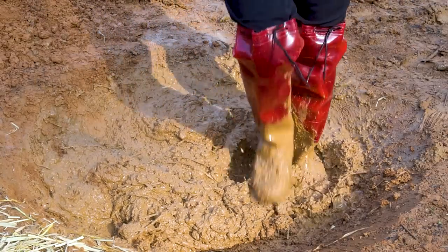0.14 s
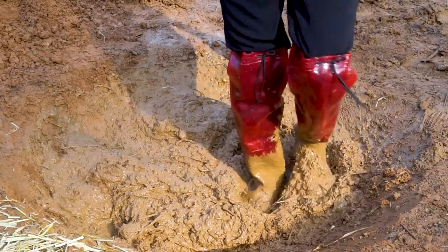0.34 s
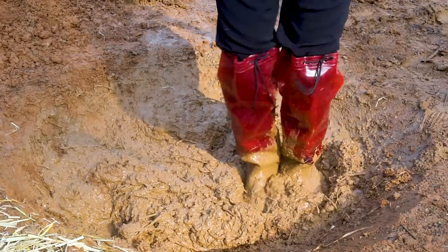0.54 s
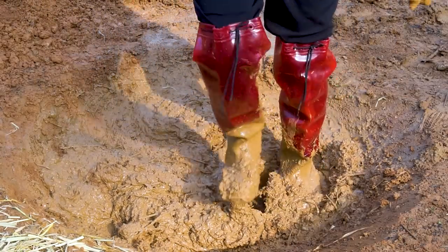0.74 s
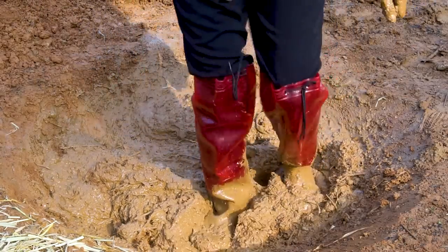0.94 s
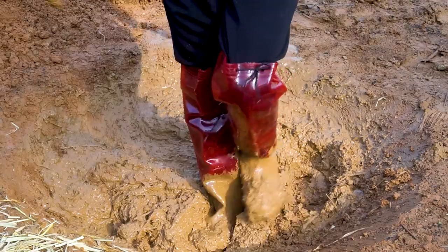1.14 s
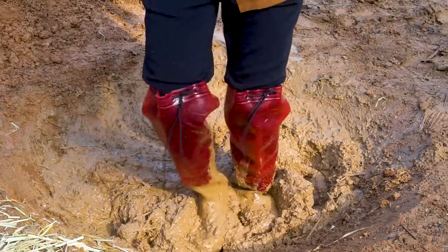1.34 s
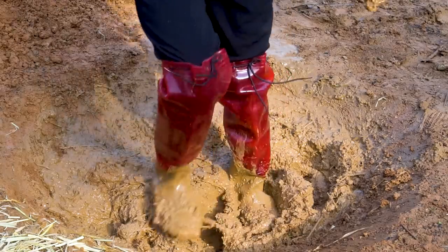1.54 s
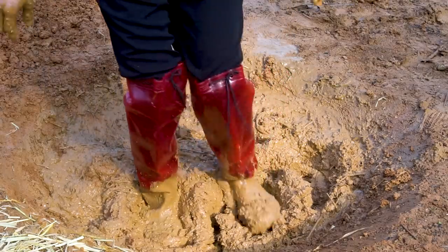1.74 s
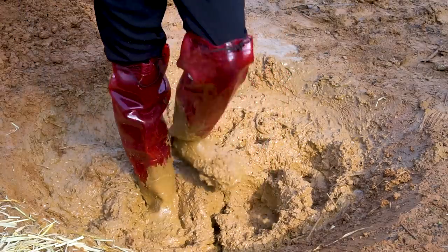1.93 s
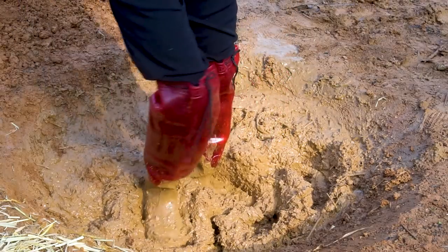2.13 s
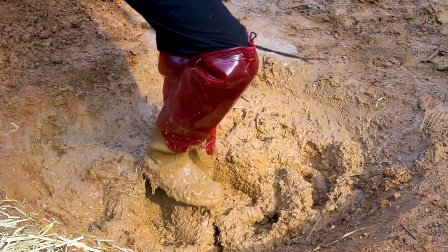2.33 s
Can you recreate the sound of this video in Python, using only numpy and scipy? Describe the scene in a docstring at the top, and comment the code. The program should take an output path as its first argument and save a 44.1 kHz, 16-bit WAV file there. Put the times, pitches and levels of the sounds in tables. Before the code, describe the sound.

Rubber boots squelch in thick wet mud, close and crisp outdoors. Splashy, bubbly bursts at 0.2-0.4 s are followed by softer sticky ones at 0.5-0.65. After a lull, wet squeezes come at 0.9-1.0, a loud snapping plop at 1.26, fizzing suction at 1.4, sprayy squelches at 1.65, hollow plops at 1.75-1.8, and more at 2.03 and 2.2, fading to faint ticks over quiet air and thin insect-like hiss.

```python
"""Outdoors on wet mud and straw, a stereo microphone close to rubber boots, about three treads a second.
Each tread squeezes out air and water in squelches: swarms of big pockets, small bubbles and fine spray,
made of random clicks ringing many resonances. Noise bursts that ring a cavity are wet films snapping;
brief rising tones are trapped air plopping, and sparse faint ticks are the mud settling.
Behind the boots lies quiet air with a thin, insect-like hiss, both of shaped noise."""
import sys
import numpy as np
from scipy import signal
from scipy.fft import rfft, irfft, next_fast_len
from scipy.io import wavfile
from scipy.ndimage import uniform_filter1d, map_coordinates

SR = 44100
rng = np.random.default_rng(int(sys.argv[2]) if len(sys.argv) > 2 else 0)


def dump_mix(stems):
    """Bounce the given channels to the path in sys.argv[1] as a 16-bit WAV at rate SR."""
    frames = np.atleast_2d(stems).T  # one column per channel
    limited = np.clip(frames, -1, 1)  # hard clip at full scale
    pcm = np.round(limited * 32767).astype(np.int16)
    wavfile.write(sys.argv[1], SR, pcm)


N = 110250
TIME = np.arange(N) / SR

# Squelches, in time order: peak_s, swell_s, fade_s, pockets_db, bubbles_db, spray_db, bubble_pitch_hz
SQUELCHES = [ (.005, 0.0063, 0.032, -52, -48, -49.5, 2420), (0.209, 0.011, 0.018, -38, -29, -27, 2580),
             (0.232, 0.0042, 0.0048, -30.5, -28.5, -21, 2520), (0.265, 0.016, 0.025, -50, -40, -41, 2220),
             (0.286, 0.0079, 0.017, -33.5, -34.5, -58, 1290),
             (0.303, 0.012, 0.024, -37.5, -33.5, -43.5, 1560),
             (0.369, 0.0086, 0.0088, -39, -35, -45.5, 2420), (0.386, 0.02, 0.061, -46.5, -46, -50, 1200),
             (0.512, 0.012, 0.011, -41, -39, -37, 3530), (0.537, 0.0096, 0.014, -36.5, -36.5, -32, 2080),
             (0.617, 0.068, 0.013, -50, -43.5, -47, 2080), (0.637, 0.024, 0.04, -51.5, -41.5, -43.5, 2680),
             (0.897, 0.0061, 0.013, -37, -34.5, -27, 3280), (0.94, 0.043, 0.022, -47, -38.5, -37.5, 2310),
             (0.989, 0.01, 0.0072, -38, -49, -63, 1800), (1.016, 0.021, 0.021, -46.5, -40.5, -40.5, 3030),
             (1.10, 0.077, 0.05, -59, -54, -52, 2900), (1.24, 0.014, 0.01, -44.5, -37.5, -31, 2480),
             (1.250, 0.0049, 0.0075, -34, -32, -34.5, 1900),
             (1.266, 0.0073, 0.0089, -30.5, -26.5, -29.5, 1780),
             (1.297, 0.015, 0.013, -45.5, -41.5, -44, 1690), (1.321, 0.016, 0.0072, -51, -38, -36, 2400),
             (1.336, 0.0059, 0.0067, -41.5, -43.5, -33, 2800), (1.407, 0.038, 0.023, -45, -28.5, -31, 3300),
             (1.42, 0.0031, 0.017, -41, -41, -55, 2030), (1.629, 0.0092, 0.016, -43.5, -39, -32, 3230),
             (1.644, 0.0066, 0.011, -37, -29.5, -24, 3140), (1.685, 0.029, 0.041, -55.5, -50, -48.5, 2500),
             (1.751, 0.011, 0.033, -36.5, -41, -51, 1290), (1.795, 0.012, 0.0086, -35.5, -30, -29, 2130),
             (1.799, 0.0091, 0.0062, -26.5, -28, -43, 1340), (1.82, 0.0027, 0.01, -42.5, -40.5, -41, 3550),
             (1.89, .041, 0.067, -57.5, -60, -51.5, 3020), (2.018, 0.0024, 0.003, -50, -30.5, -33, 2420),
             (2.037, 0.015, 0.0034, -32.5, -32.5, -25.5, 2200),
             (2.056, 0.044, 0.017, -44.5, -45, -43, 2280), (2.111, 0.031, 0.053, -54, -47, -45.5, 2300),
             (2.175, 0.019, 0.011, -43, -36, -38, 3330), (2.213, 0.022, 0.013, -32, -27, -27.5, 1950),
             (2.30, 0.052, 0.12, -64.5, -62, -52.5, 2380), (2.474, 0.036, 0.1, -58, -51.5, -47.5, 2720), ]
# Wet films snapping: start_s, level_db, cavity_pitch_hz, crack_re_cavity_db (both dB before the trims below)
SNAPS = [(0.2253, -15.5, 2560, 5), (.322, -17, 3950, -16), (0.3317, -20.5, 1520, -1.5),
         (0.3666, -15, 2320, -26), (0.409, -23.5, 2590, -22), (0.4407, -27.5, 3820, -10),
         (0.504, -27, 2700, -13), (0.531, -17.5, 2090, -7.5), (0.581, -24.5, 2260, -7),
         (0.866, -39.5, 8900, -1), (0.8893, -17.5, 3520, -9), (0.924, -19.5, 5630, -11),
         (.962, -30, 2310, 8), (1.034, -23, 2000, 3), (1.1201, -19, 2270, -40), (1.2619, -20, 1850, 3),
         (1.2652, -8, 2010, -1), (1.6448, -25, 4840, 6), (1.692, -20, 1820, -18), (1.708, -28, 3700, -16),
         (1.783, -16, 2850, -24), (2.014, -45, 4140, 11), (2.1041, -23, 1990, 6), (2.1164, -29.5, 2500, 13),
         (2.173, -15.5, 3500, -10), (2.446, -35.5, 2450, 7.5), (2.459, -38, 2530, 14),
         (2.480, -32.5, 3030, 12.5)]
# Trapped air plopping: start_s, level_db, start_pitch_hz, ring_t60_s
PLOPS = [(.228, -18, 2480, 0.029), (.279, -27, 1244, .025), (0.2989, -23.5, 1830, 0.02),
         (.386, -35, 555, 0.036), (.980, -30.5, 365, 0.057), (0.994, -25.5, 1840, 0.011),
         (1.2448, -25, 1870, 0.018), (1.2622, -11.5, 1120, 0.011), (1.264, -18, 680, 0.023),
         (1.7405, -23, 553, 0.044), (1.756, -32, 1700, 0.01), (1.769, -24, 470, 0.0071),
         (1.774, -11, 1650, 0.0078), (1.793, -18, 1230, 0.012), (1.7965, -20, 573, .02),
         (2.139, -28.5, 793, 0.035), (2.2015, -21, 3280, 0.019), (2.202, -24, 728, 0.044)]
# Colour of each swarm, by the pitch of its bubbles: pitch_hz, level_db
POCKET_COLOUR = [(220, -9.5), (330, -0.5), (460, -1.5), (660, -1), (900, 10.5)]
BUBBLE_COLOUR = [(900, -29), (1200, 0), (1800, -1), (2500, -0.5), (3300, 1), (4200, 1)]
SPRAY_COLOUR = [(4500, 4.5), (6000, -1.8), (8500, -5.5), (11500, 4), (15000, 0.5)]
# Resonances of the boots and the trodden hollow: pitch_hz, level_db
HOLLOW = [(1190, -19.5), (2450, -11.5), (3250, -4.5), (4800, -9)]
# Where the boots stand before the microphone: time_s, left_minus_right_db
PAN = [(.3, -2.1), (.95, -1.6), (1.4, -1.7), (1.75, -0.9), (2.1, -1)]
# Fixed stereo offset, level: frequency_hz, left_minus_right_db
LEFT_LOUDER = [(200, 2), (700, 2), (1300, 2.5), (2400, 1.5), (4400, 4.5), (8000, 6), (15000, 4)]
# Fixed stereo offset, phase: frequency_hz, right_lead_rad
RIGHT_LEADS = [(100, 0), (500, 0.5), (950, 0.66), (2400, 0.3), (3900, 0.11), (5000, 0.42), (8000, 0.43),
               (15000, 0.67)]
# Spectrum of the quiet air: frequency_hz, density_db (dB per Hz, relative)
AIR = [(30, -19), (120, -11.5), (300, 0), (700, 6), (1000, 1.5), (1800, 0.5), (3000, -2), (4300, -3),
       (6500, -4.5), (9500, -6), (11500, -1), (16000, -10.5)]

# Squelches
SWELL_SHAPE, FADE_SHAPE = 1.99, 1.37  # 1 = exponential, 2 = bell
BUBBLE_RANGE_OCT, PITCH_FALL_OCT_PER_S = 1, 4.8
# the slower a squeeze swells, the less of the finest spray it throws: dB per second of swell
MIST_HZ, MIST_LOSS_DB_PER_S = 9000, 113
# Grain: bursts per s for each size, cycles rung, spread of strength in dB, share bursting together
POCKET_GRAIN = (70, 15, 2.5, .2)
BUBBLE_GRAIN = (110, 30, 3.8, .18)
SPRAY_GRAIN = (600, 26, 4.2, .22)
CLUMP_PER_S, CLUMP_DB = 45, 3  # wander of the burst strength
STRETCH_PER_S, STRETCH_SHARE = 20, .08  # wander of the pitch

# Snaps, plops and settling mud
SNAP_DB, SNAP_DECAY_S, SNAP_CYCLES = -11.5, 0.0018, 7.7
CRACK_DB, CRACK_BAND_HZ = 1, (690, 15000)
PLOP_ATTACK_CYCLES, PLOP_RISE_PER_S = 1.56, 3.7  # pitch rises by this share of its start per second
SETTLING_DB, SETTLING_PER_S, SETTLING_SPREAD_DB, SETTLING_CYCLES = -66.5, 11, 2.5, 14

# Place and background
HOLLOW_WIDTH_HZ = 73
LOW_CUT_HZ = 132
GROUND_ECHO_S, GROUND_ECHO_DB, GROUND_DULL_HZ = .00166, -7, 3500
TAIL_DB, TAIL_T60_S, TAIL_DULL_HZ = -15, 0.28, 5540
AIR_DB = -57.5
INSECT_HZ, INSECT_WIDTH_HZ, INSECT_DB = 5050, 270, -58
CUTOFF_HZ = 16000


def squelches():
    """Each squeeze swells and fades, driving the three swarms; the small bubbles centre on a falling pitch."""
    power, octave, mist = np.zeros((3, N)), np.zeros(N), np.zeros(N)
    for peak_s, swell, fade, *levels_db, hz in SQUELCHES:
        t = TIME - peak_s
        before = (np.abs(t) / swell) ** SWELL_SHAPE
        after = (np.abs(t) / fade) ** FADE_SHAPE
        envelope = np.exp(-np.minimum(np.where(t < 0, before, after), 20))
        flow = (from_db(levels_db)[:, None] * envelope) ** 2
        power += flow
        mist += flow[2] * from_db(-MIST_LOSS_DB_PER_S * swell)
        octave += flow[1] * (np.log2(hz) - PITCH_FALL_OCT_PER_S * np.clip(t, -swell, 2 * fade))
    centre = octave / power[1]  # overlapping squeezes share the pitch by their power

    def near_centre(hz):
        """Bubbles far in pitch from the moving centre are weaker."""
        return 1 / (1 + ((np.log2(hz) - centre) / BUBBLE_RANGE_OCT) ** 2)

    pockets = swarm(POCKET_COLOUR, POCKET_GRAIN, even_s=.011)
    bubbles = swarm(BUBBLE_COLOUR, BUBBLE_GRAIN, even_s=.007, weight=near_centre)
    spray = swarm(SPRAY_COLOUR, SPRAY_GRAIN, even_s=.005)
    hz = np.arange(N // 2 + 1) * SR / N
    finest = irfft(rfft(spray) * (hz > MIST_HZ), N)
    spray = spray + (mist / power[2] - 1) * finest
    return np.sum(np.sqrt(power) * [pockets, bubbles, spray], axis=0)


def swarm(colour, grain, even_s, weight=lambda hz: 1, count=14):
    """Bubbles of many sizes burst in clumps, alone or together, gliding as the mud deforms; flow is evened."""
    per_s, cycles, spread_db, together = grain
    lowest_hz, highest_hz = colour[0][0], colour[-1][0]
    shared, out = bursts(per_s, spread_db), 0
    # an uneven clock bends the pitch of all sizes alike
    clock = np.cumsum(1 + STRETCH_SHARE * drift(STRETCH_PER_S))
    for hz in np.geomspace(lowest_hz, highest_hz, count):
        clicks = bursts(per_s, spread_db) + together * shared * rng.standard_normal(N)
        clumped = clicks * from_db(CLUMP_DB * drift(CLUMP_PER_S))
        rings = resonate(clumped, hz, cycles)
        gliding = map_coordinates(rings, [clock], order=3, mode="mirror")
        out = out + from_db(at_hz(colour, hz)) * weight(hz) * rms_one(gliding)
    low_cut = signal.butter(3, lowest_hz * 1.154, "high", fs=SR, output="sos")
    out = rms_one(signal.sosfilt(low_cut, out))
    # divide by the running level, averaged twice, so the squeezes alone shape the flow
    size = int(even_s * SR) + 1
    running_power = uniform_filter1d(uniform_filter1d(out ** 2, size), size)
    return out / np.sqrt(running_power + 1e-4)


def snaps():
    """A film tears in a tiny crack that rings the cavity behind it."""
    out, t = np.zeros(N + SR), TIME[:SR // 20]
    crack_band = signal.butter(2, CRACK_BAND_HZ, "band", fs=SR, output="sos")
    for start_s, level_db, hz, crack_re_cavity_db in SNAPS:
        tear = rng.standard_normal(len(t)) * np.exp(-t / SNAP_DECAY_S)
        cavity = resonate(tear, hz, SNAP_CYCLES)
        crack = signal.sosfilt(crack_band, tear)
        snap = rms_one(cavity) + from_db(CRACK_DB + crack_re_cavity_db) * rms_one(crack)
        i = int(start_s * SR)
        out[i:i + len(t)] += from_db(level_db + SNAP_DB) * snap * np.sqrt(SNAP_DECAY_S / t[-1])
    return out[:N]


def plops():
    """A large air pocket opens and rings briefly, rising in pitch."""
    out = np.zeros(N)
    for start_s, level_db, hz, t60 in PLOPS:
        t = np.clip(TIME - start_s, 0, 2 * t60)
        decay = from_db(level_db - 60 * t / t60)
        attack = 1 - np.exp(-(t * hz / PLOP_ATTACK_CYCLES) ** 2)
        cycles = hz * (t + PLOP_RISE_PER_S * t * t / 2)
        out += decay * attack * np.sin(2 * np.pi * cycles)
    return out


def settling():
    """Kneaded mud relaxes in faint, sparse ticks at seven spread pitches."""
    ticks = 0
    for hz in np.geomspace(2000, 13000, 7):
        ticks = ticks + resonate(bursts(SETTLING_PER_S, SETTLING_SPREAD_DB), hz, SETTLING_CYCLES)
    return from_db(SETTLING_DB) * rms_one(ticks)


def hollow(x):
    """The same few resonances of boots and hollow colour every squelch and snap."""
    out = x
    for hz, level_db in HOLLOW:
        b, a = signal.iirpeak(hz, hz / HOLLOW_WIDTH_HZ, fs=SR)
        out = out + from_db(level_db) * signal.lfilter(b, a, x)
    return out


def outdoors(x):
    """A bounce off the ground, a place slightly off centre, and a faint scattered tail from the yard."""
    size = next_fast_len(N + SR)
    hz = np.arange(size // 2 + 1) * SR / size
    delay = np.exp(-2j * np.pi * hz * GROUND_ECHO_S)
    bounce = from_db(GROUND_ECHO_DB) * delay / (1 + (hz / GROUND_DULL_HZ) ** 2)
    near = rfft(x, size) * (1 + bounce)
    # half of the level and phase offset goes to each channel
    left = from_db(at_hz(LEFT_LOUDER, hz) / 2) * np.exp(-.5j * at_hz(RIGHT_LEADS, hz))
    fading_noise = rng.standard_normal((2, SR)) * from_db(-60 * TIME[:SR] / TAIL_T60_S)
    scatter = rms_one(fading_noise) / np.sqrt(SR)  # unit energy
    tail = from_db(TAIL_DB) * rfft(scatter, size) / (1 + 1j * hz / TAIL_DULL_HZ)
    return irfft(near * (np.array([left, 1 / left]) + tail), size)[:, :N]


def background():
    """Still air and a narrow, far, insect-like hiss: shaped noise, independent in each channel."""
    hz = np.arange(N // 2 + 1) * SR / N
    air = irfft(rfft(rng.standard_normal((2, N))) * from_db(at_hz(AIR, hz)), N)
    insect_band = 1 / (1 + ((hz - INSECT_HZ) / INSECT_WIDTH_HZ) ** 2)
    insects = irfft(rfft(rng.standard_normal((2, N))) * insect_band, N)
    return from_db(AIR_DB) * rms_one(air) + from_db(INSECT_DB) * rms_one(insects)


def bursts(per_s, spread_db):
    """Random clicks of uneven size and sign."""
    sizes = from_db(spread_db * np.minimum(rng.exponential(1, N), 4))
    signs = rng.choice([-1, 1], N)
    return sizes * signs * (rng.random(N) < per_s / SR)


def resonate(x, hz, cycles):
    """A resonance that dies by 60 dB in so many cycles, with about unit gain at its peak."""
    r = from_db(-60 * hz / (cycles * SR))
    gain = (1 - r * r) / 2
    poles = [1, -2 * r * np.cos(2 * np.pi * hz / SR), r * r]
    return signal.lfilter([gain, 0, -gain], poles, x + 1e-18)


def drift(per_s):
    """A smooth random wander of unit rms: noise through two equal low-passes."""
    r = np.exp(-2 * np.pi * per_s / SR)
    lead_in = SR // 4
    wander = signal.lfilter([1], [1, -2 * r, r * r], rng.standard_normal(N + lead_in))
    return rms_one(wander[lead_in:])


def from_db(db):
    """Decibels to gain."""
    return 10 ** (np.asarray(db) / 20)


def rms_one(x):
    """Scale to unit power."""
    return x / np.sqrt(np.mean(x ** 2) + 1e-20)


def at_hz(points, hz):
    """Read a table on a log-frequency axis."""
    f, value = np.transpose(points)
    return np.interp(np.log(hz + 1e-9), np.log(f), value)


def scene():
    """The mud under the shifting boots, with little bass, in the open air."""
    low_cut = signal.butter(2, LOW_CUT_HZ, "high", fs=SR, output="sos")
    mud = signal.sosfilt(low_cut, hollow(squelches() + snaps()) + plops() + settling())
    pan_db = np.interp(TIME, *np.transpose(PAN))
    boots = outdoors(mud) * from_db([pan_db / 2, -pan_db / 2])
    return boots + background()


def record(dry):
    """A steep low-pass cuts the top."""
    return signal.sosfilt(signal.ellip(10, .2, 80, CUTOFF_HZ, fs=SR, output="sos"), dry)


dry = scene()
out = record(dry)
dump_mix(out)
```